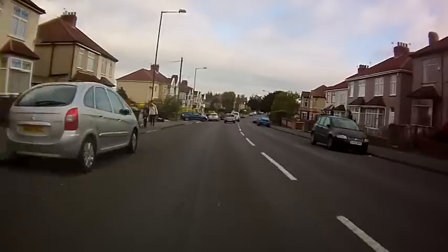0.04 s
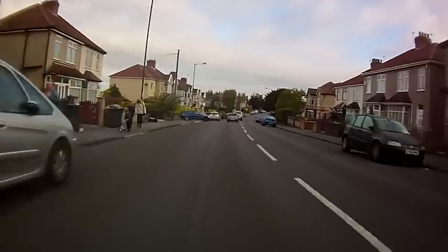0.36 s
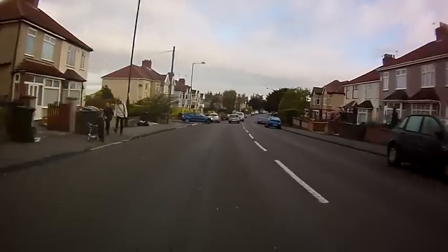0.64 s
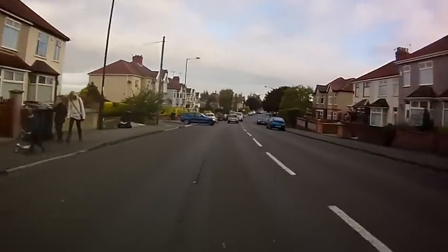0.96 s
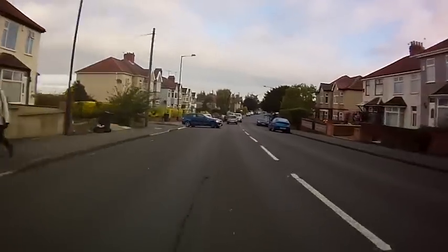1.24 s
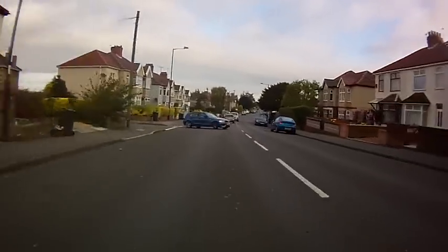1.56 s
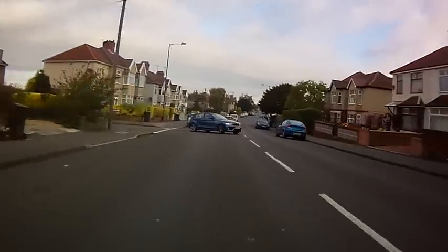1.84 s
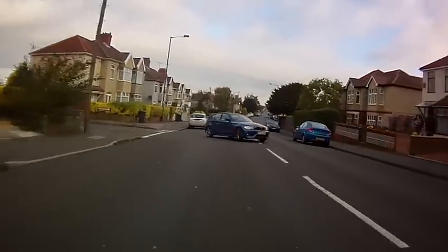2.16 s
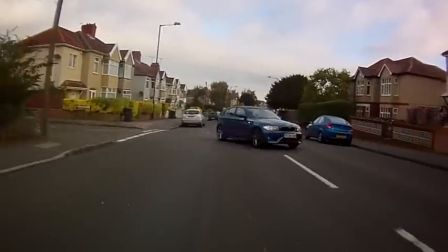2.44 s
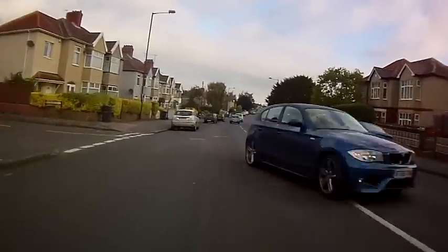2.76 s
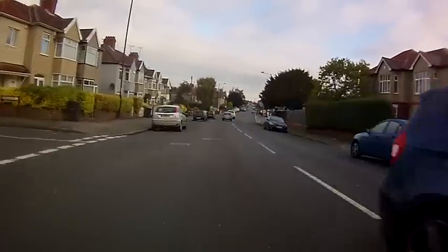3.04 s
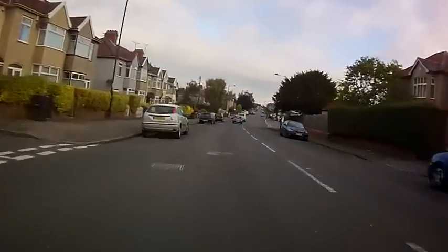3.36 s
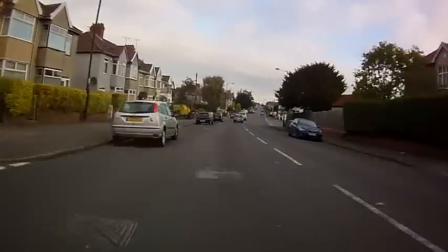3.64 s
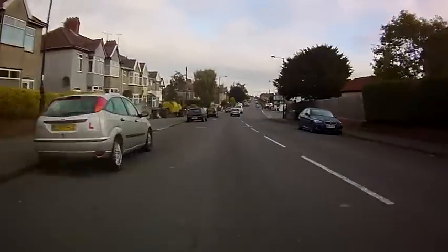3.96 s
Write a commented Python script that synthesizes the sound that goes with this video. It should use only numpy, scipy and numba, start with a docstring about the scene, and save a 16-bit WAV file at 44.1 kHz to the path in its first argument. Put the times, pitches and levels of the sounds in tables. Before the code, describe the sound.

An air horn sounds one long, loud, slightly distorted blast from a moving bicycle. Before and after it, wind and road noise rush over the bike's microphone, with a low hum and small, dry rattles.

```python
"""Air horn from a bicycle

A bicycle rolls along a residential street, rattling over bumps; wind buffets the small camera on it
and the road shakes its mount. The rider holds one long blast on an air horn, a reed driven by
compressed air. The camera overloads, turns its gain down for the blast and slowly back up,
and its coarse sample-and-hold mirrors every sound into a gritty treble."""
import sys
import numpy as np
from scipy import signal
from scipy.fft import rfft, irfft
from scipy.io import wavfile
from scipy.ndimage import uniform_filter1d
from numba import njit

SR = 44100
rng = np.random.default_rng(int(sys.argv[2]) if len(sys.argv) > 2 else 0)


def log_audio(samples):
    """Write samples as a 16-bit WAV file to the path given in sys.argv[1]."""
    # one column per channel
    frames = np.atleast_2d(samples).T
    # limit to full scale, then quantise
    limited = np.clip(frames, -1, 1)
    pcm = np.round(limited * 32767).astype(np.int16)
    wavfile.write(sys.argv[1], SR, pcm)


N = 176400

# Fader moves of the three riding layers: time_s, rush_db, buffet_db, mount_db
RIDE_LEVELS = [(0, -11, -5.5, -13), (.33, -8, -8, -2.5), (.6, -3.5, -9, -10), (1.0, -3, -2.5, -4),
               (1.35, -5, -10.5, -2.5), (1.65, -1.5, -5, -8.5), (2.0, -5.5, -12, -6), (2.6, -7, -12.5, -9),
               (3.1, -7.5, -10, -6), (3.3, -7, -12.5, -4), (3.6, -6.5, -10, -5.5), (3.72, -5.5, -4, -8.5),
               (4.0, 1, -2, -1)]


def undb(db):
    """Decibels to gain."""
    return 10 ** (np.asarray(db) / 20)


def curve(table, column):
    """One column of a table, joined by straight lines in time."""
    rows = np.array(table)
    return np.interp(np.arange(N) / SR, rows[:, 0], rows[:, column])


def noise(gain):
    """Noise of rms 1 whose spectrum is shaped by gain(hz)."""
    hz = np.maximum(np.arange(N // 2 + 1) * SR / N, 1)
    x = irfft(rfft(rng.standard_normal(N)) * gain(hz), N)
    return x / x.std()


def coloured(spectrum):
    """Noise shaped by an EQ curve of (Hz, dB) points."""
    rows = np.array(spectrum)
    return noise(lambda hz: undb(np.interp(np.log(hz), np.log(rows[:, 0]), rows[:, 1])))


def resonant(centre_hz, width_hz):
    """Noise through one resonance."""
    return noise(lambda hz: 1 / (1 + 1j * (hz ** 2 - centre_hz ** 2) / (hz * width_hz)))


def wander(rate_hz):
    """Smooth random modulation of spread 1."""
    return noise(lambda hz: 1 / (1 + (hz / rate_hz) ** 2) ** 2)


def road_rush():
    """Wind and road make a broad, fluttering rush."""
    # Colour of the rush: frequency_hz, relative_db
    spectrum = [(20, -19), (60, -0.5), (130, -0.5), (195, -4), (300, -6.5), (380, -8), (700, -8),
                (950, -22), (1700, -25), (3000, -31.5)]
    flutter_db = 1.5 * wander(rate_hz=34)
    return coloured(spectrum) * undb(curve(RIDE_LEVELS, column=1) + flutter_db)


def wind_buffet():
    """Gusts hit the microphone with a low, uneven rumble."""
    # Colour of the rumble: frequency_hz, relative_db
    spectrum = [(8, -13.5), (25, 0), (60, -13.5), (120, -8.5), (300, -27.5), (1000, -73), (3000, -49)]
    gust_db = 2 * wander(rate_hz=29)
    return coloured(spectrum) * undb(curve(RIDE_LEVELS, column=2) + gust_db)


def mount_hum():
    """The road shakes the camera mount, which hums at its resonances."""
    # Resonances of the mount: centre_hz, width_hz, level_db
    modes = [(238.5, 11.2, -2.5), (284, 24, -5)]
    hum = sum(undb(db) * resonant(hz, width_hz) for hz, width_hz, db in modes)
    return hum * undb(curve(RIDE_LEVELS, column=3))


def rattles(t):
    """Bumps shake short, dry knocks out of the bicycle's fittings."""
    # One knock a row: start_s, level_db, centre_hz
    knocks = [(.549, -27, 1850), (.573, -11, 1600), (0.803, -7, 1910), (0.834, -21, 1900),
              (0.947, -10, 2200), (2.63, 0, 2903), (3.048, -13, 2900), (3.207, -5, 2970),
              (3.467, -3.5, 1840), (3.572, -13, 2000), (3.668, -7.5, 1906), (3.988, 1.5, 1926)]
    decay_s = 0.0032
    out = np.zeros(N)
    for start_s, level_db, centre_hz in knocks:
        envelope = (t >= start_s) * np.exp(-np.abs(t - start_s) / decay_s)
        out += undb(level_db) * envelope * resonant(centre_hz, width_hz=890)
    return out


def air_horn(t):
    """Compressed air drives a reed: sharp and rough at first, then a piercing tone with a fading rasp."""
    # Balance of the three main partials: time_s, first_db, second_db, third_db
    partial_levels = [(1.72, -7.5, -5.5, -8), (1.802, -12.5, -6, -6), (2.112, -9.5, -5.5, -6.5),
                      (2.196, -10, -5.5, -8.5), (2.272, -12.5, -7, -8), (2.528, -11, -8, -9),
                      (2.718, -12, -13, -6), (2.94, -13, -10.5, -12), (3.09, -13, -15.5, -10.5)]
    on_s, off_s, level_db = 1.674, 3.111, 21
    attack_s, ring_s, kick_s = 0.012, 0.0091, 0.0289
    base_hz, creep_hz_per_s, kick_hz = 788.4, 4.0, 19
    rasp_fade_db_per_s = 11.5
    age = np.maximum(t - on_s, 0)
    valve = 1 - np.exp(-age / attack_s)
    ring = np.exp(-np.maximum(t - off_s, 0) / ring_s)
    kick = np.exp(-(age / kick_s) ** 2)  # the first rush of air drives the reed sharp
    jitter = (0.00083 + 0.00604 * kick) * wander(rate_hz=175)
    pitch_hz = (base_hz + creep_hz_per_s * age + kick_hz * kick) * (1 + jitter)
    phase = 2 * np.pi * np.cumsum(pitch_hz) / SR
    tone = 0
    for k in range(1, 4):
        partial = np.sin(k * phase + np.pi * k * (k - 1) / 2)  # the flare spreads each pulse out
        shimmer_db = 0.32 * wander(rate_hz=91)
        tail = ring ** np.sqrt(k)  # overtones die sooner
        tone += undb(curve(partial_levels, column=k) + shimmer_db) * tail * partial
    fourth_partial = undb(-9) * np.cos(4 * phase)
    escaping_air = undb(-21.5) * resonant(centre_hz=2860, width_hz=1240)
    rasp = (fourth_partial + escaping_air) * ring * undb(-rasp_fade_db_per_s * age)
    opening_puff = undb(-15.5) * kick * resonant(centre_hz=600, width_hz=1100)
    return undb(level_db) * valve * (tone + rasp + opening_puff)


@njit
def follow(level, rest, attack_s, release_s):
    """Envelope follower that never sinks under its resting value."""
    out, envelope = np.empty(len(level)), rest
    for i in range(len(level)):
        lag_s = attack_s if level[i] > envelope else release_s
        envelope = max(envelope + (level[i] - envelope) / (lag_s * SR), rest)
        out[i] = envelope
    return out


def auto_gain(x):
    """The camera ducks quickly when the level passes its target and recovers more slowly."""
    target = 0.47
    level = uniform_filter1d(np.abs(x), size=512)
    return x * target / follow(level, target, attack_s=0.071, release_s=0.17)


def saturate(x, ceiling, knee):
    """Soft clipping; a higher knee is harder."""
    return x / (1 + np.abs(x / ceiling) ** knee) ** (1 / knee)


def converter(x):
    """A slow converter clips and holds each sample; the steps mirror the sound into the treble."""
    band_hz, hold_hz, top_hz = 2900, 6000, 15450
    oversample = 8
    narrow = signal.sosfiltfilt(signal.butter(6, band_hz, fs=SR, output="sos"), x)
    coarse = saturate(signal.resample_poly(narrow, hold_hz, SR), ceiling=.94, knee=11.2)
    held = signal.resample_poly(np.repeat(coarse, oversample), SR, oversample * hold_hz)[:N]
    return signal.sosfiltfilt(signal.ellip(10, .05, 60, top_hz, fs=SR, output="sos"), held)


def scene():
    """Horn, riding noise and rattles, mixed in mono at the camera."""
    t = np.arange(N) / SR
    horn = air_horn(t)
    rush, buffet, hum = road_rush(), wind_buffet(), mount_hum()
    gust_db = 0.5 * wander(rate_hz=9)
    riding = (rush + hum) * undb(gust_db) + buffet
    return (horn + riding + rattles(t))[None]


def record(dry):
    """The camera's sound switches on and runs through gain control, an overloaded preamp and converter."""
    start_s, fade_in_s, drive_db = .0605, .002, 1
    switch_on = np.clip((np.arange(N) / SR - start_s) / fade_in_s, 0, 1)
    levelled = auto_gain(dry[0] * switch_on)
    preamp = saturate(levelled * undb(drive_db), ceiling=1.22, knee=16)
    return converter(preamp)[None]


dry = scene()
out = record(dry)
log_audio(out)
```